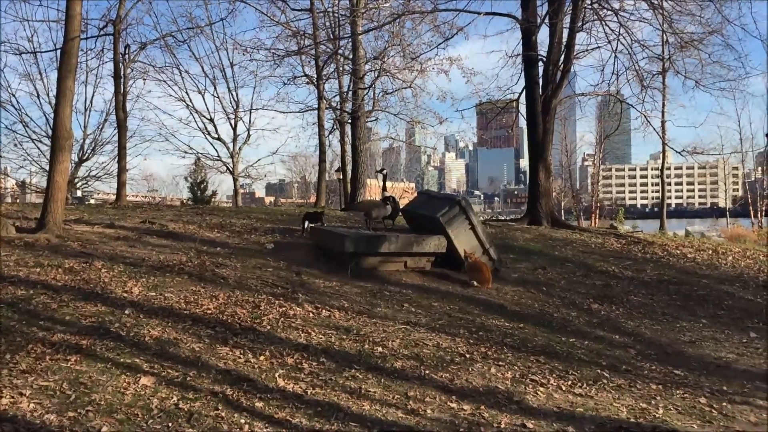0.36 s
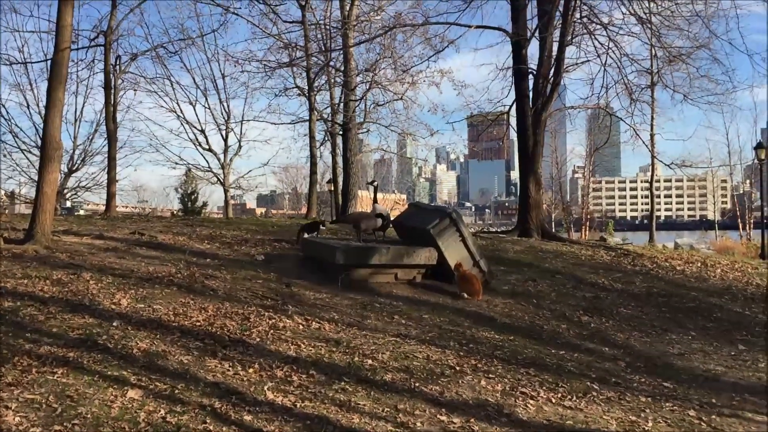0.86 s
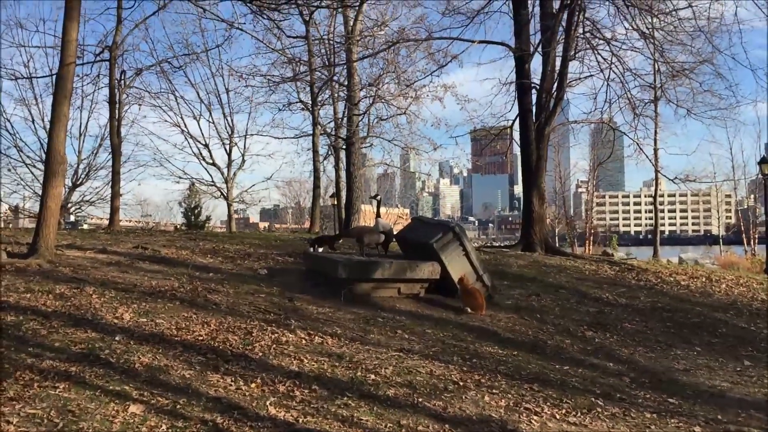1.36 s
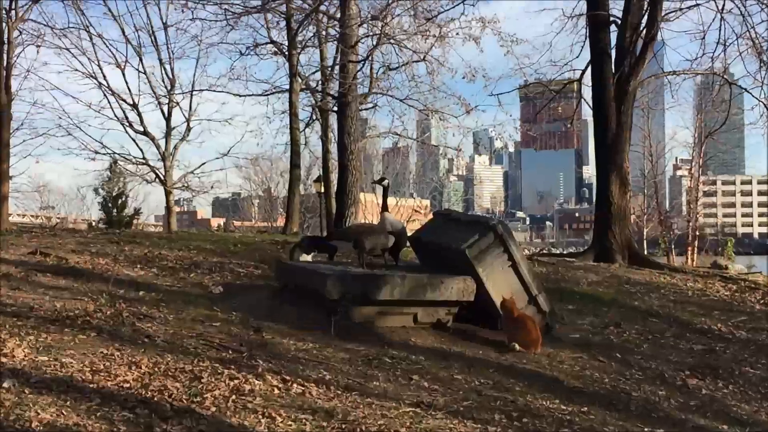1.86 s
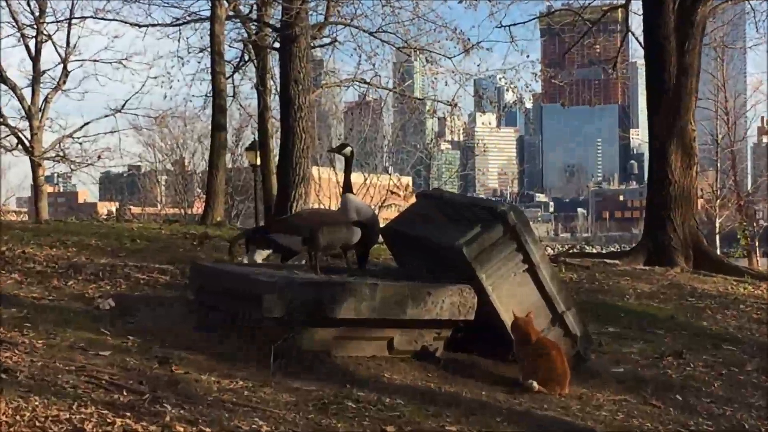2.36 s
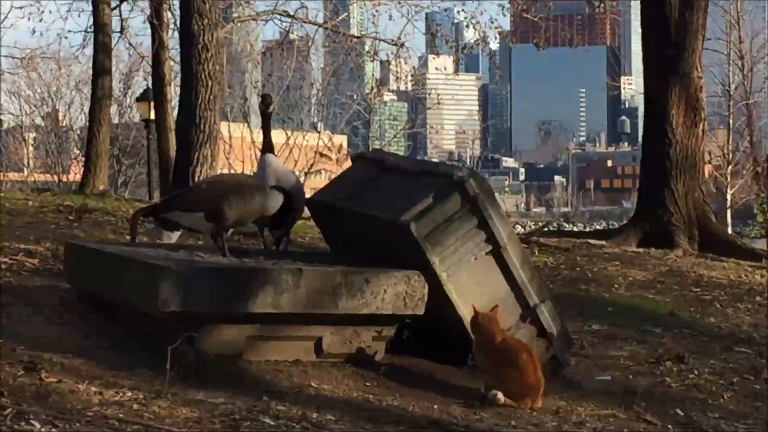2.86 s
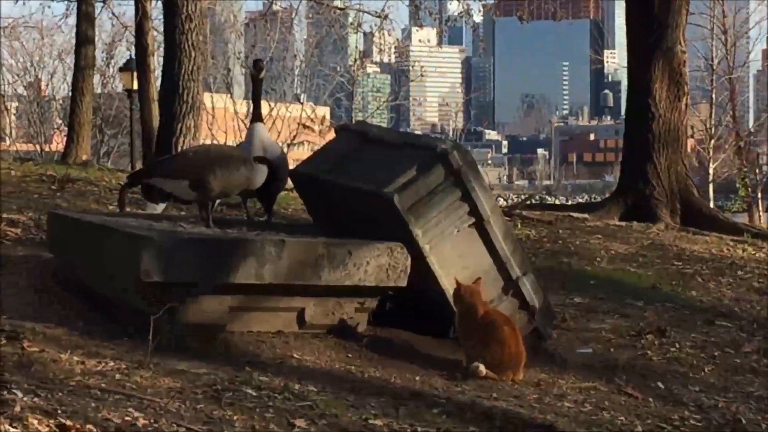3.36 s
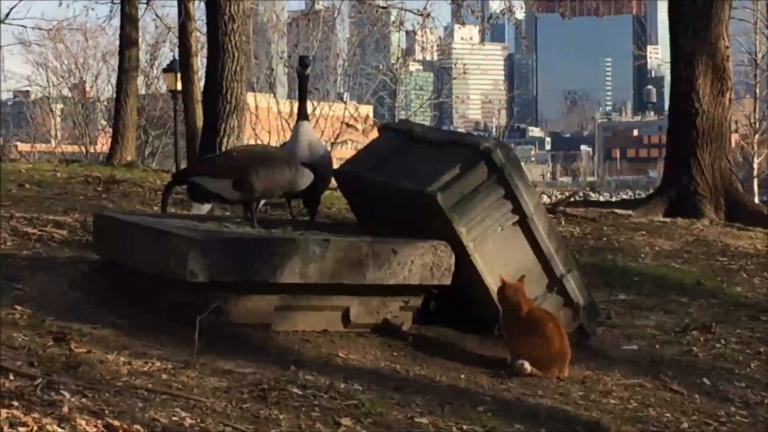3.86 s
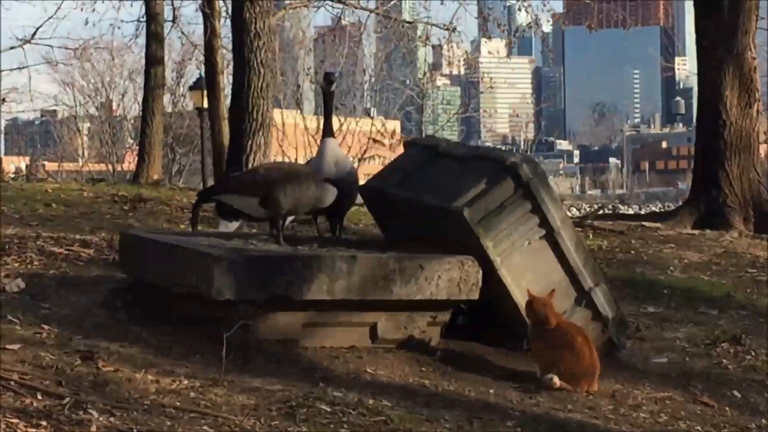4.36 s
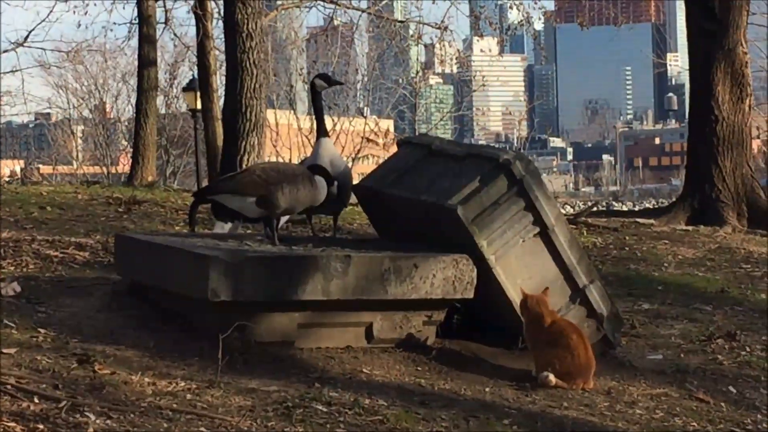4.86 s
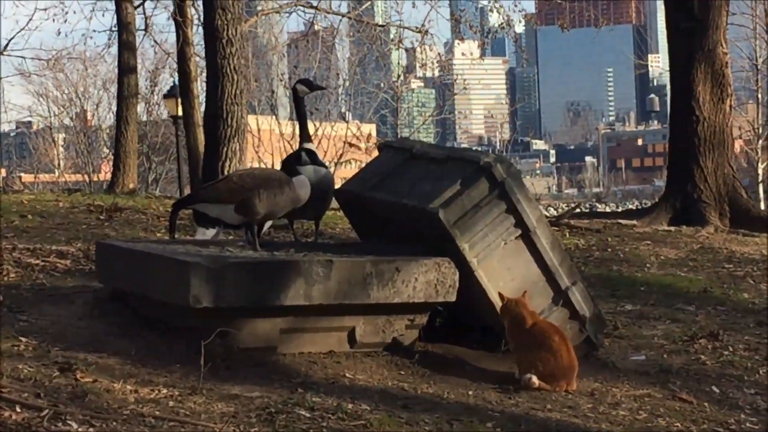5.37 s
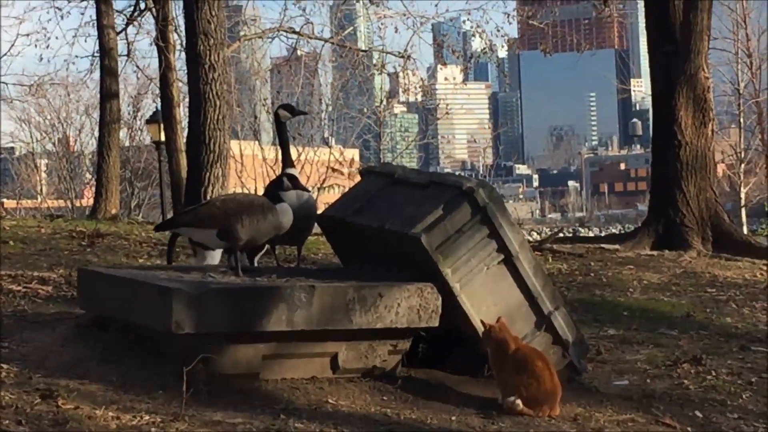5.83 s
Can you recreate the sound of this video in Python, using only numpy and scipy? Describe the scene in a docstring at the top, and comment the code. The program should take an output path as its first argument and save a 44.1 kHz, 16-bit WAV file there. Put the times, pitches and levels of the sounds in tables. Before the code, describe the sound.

Two brief, nasal goose honks echo across a park over steady low city rumble, with hard close clicks, cloth rustle and tiny metallic chinks.

```python
"""Goose in a riverside city park

One goose some metres from a hand-held phone honks twice: stacked partials with a breathy rasp before each.
Filtered copies return from trees and far walls. Close to the microphone, fingers tick and creak on the
phone's case (pulses and gritty noise in resonances), a sleeve rustles (shaped noise) and small metal pieces
chink (noise cracks with ringing sines). Low traffic rumble, roar and hiss lie behind it all (shaped noise).
"""
import sys
import numpy as np
from scipy import signal
from scipy.fft import rfft, irfft
from scipy.io import wavfile
from scipy.ndimage import uniform_filter1d

SR = 44100
rng = np.random.default_rng(int(sys.argv[2]) if len(sys.argv) > 2 else 0)


def output_pcm(signal):
    """Save a mono or channel-first signal as 16-bit PCM at the path in sys.argv[1].

    Samples are clipped to [-1, 1] before scaling.
    """
    pcm = np.clip(np.atleast_2d(signal).T, -1, 1) * 32767
    wavfile.write(sys.argv[1], SR, np.round(pcm).astype(np.int16))


def rack_gain(trim_db):
    """Turn a fader trim in dB into the linear factor to multiply a signal by."""
    fader = np.asarray(trim_db, float)
    return 10 ** (fader / 20)


N = 274302
TIME = np.arange(N) / SR

# Honks of the goose: [voice locks t/s, length/s, base pitch f/Hz, level at the lock/dB,
# treble tilt of the beak at the end/dB per octave]
HONKS = [(0.046, 0.056, 637.7, -39, 2), (2.429, .054, 657.6, -36, 7)]
# Partials of each honk, before the beak's tilt: [multiple of the pitch, level/dB]
PARTIALS = [
    [(1, -1), (2, 4.5), (3, -10), (4, -21.5), (5, -33), (6, -24.5), (7, -28), (8, -24), (9, -26), (10, -31),
     (11, -35), (12, -37)],
    [(1, -2.5), (2, 1), (3, -14), (4, -32.5), (5, -33.5), (6, -27), (7, -38), (8, -37.5), (9, -38.5),
     (10, -41), (11, -48), (12, -58), (13, -57), (14, -58)],
]
# Throat resonances of the unvoiced breath: [f/Hz, width/Hz, level/dB]
THROAT = [(1100, 250, 11), (1298, 210, 5), (1940, 280, -20)]
# Breath swells before the lock, relative to the honk
RASP_S, RASP_FROM_DB, RASP_TO_DB = 0.11, -41.5, -7
LOCK_S, STOP_S = 0.004, 0.0053  # time for the voice to catch and to stop
FLAT_START, SETTLE_S = 0.07, 0.013  # share by which the pitch starts flat; time constant of its slide up
SAG_DB_PER_S, CLIMB_PER_S = 55, 0.26  # fall in level; share by which the pitch rises per second
BEAK_START_DB, HOARSE = -2, 0.05  # tilt at the lock in dB per octave; gain of rasp in the locked voice

# Diffuse echoes of the park: [t60/s, level before the band-pass/dB, low edge f/Hz, high edge f/Hz]
PARK = (0.64, -5, 1008, 6004)
# Clear echoes off trunks and walls: [delay t/s, level/dB]
CLEAR_ECHOES = [(0.058, -5), (0.09, -16.5), (.115, -20.5)]
# Dull late echoes off the far walls: [delay t/s, level/dB]
FAR_WALL = [(.175, -21.5), (0.204, -24.5), (0.234, -20.5)]
NEAREST_S = 0.014  # the small echoes build up over this time

# Single finger ticks on the case: [t/s, body level/dB, edge re body/dB, low modes re body/dB]
TICKS = [(.3180, -22, 3.5, -54), (0.714, -45, 2, -22), (0.7604, -29.5, 0, -8), (0.7714, -19.5, 3, -8),
         (.8498, -38, 7, -26), (0.856, -35, 15.5, -8), (0.862, -46.5, 19.5, -33), (0.8738, -37.5, 10, -27),
         (2.769, -56, 6.5, -15), (2.863, -39, -15, -19), (4.014, -28, 6.5, -7.5), (4.0490, -8, -14, -26),
         (4.0532, -9, -20, -24), (4.0655, -2, -18, -24), (4.2953, -9, -6, -20), (4.3000, -9, -8, -20),
         (4.3038, -11, -8, -18), (4.566, -54, 16.5, 4), (4.878, -72.5, -14, 23.5), (5.038, -56.5, 14, 21),
         (5.464, -56, -10, -6)]
RATTLE_DB, RATTLE_T60_S = -17, 0.005  # each tick shakes on briefly, relative to its first click
# Skin slipping over the case: [t/s, length/s, body level/dB, edge re body/dB]
CREAKS = [(0.078, 0.067, -55, 3), (0.119, 0.11, -74.5, 1), (0.266, 0.079, -64.5, 6),
          (0.495, 0.0088, -84, 15.5), (0.734, 0.061, -66, 6.5), (0.785, 0.067, -77.5, 10),
          (0.838, 0.068, -66, 8), (1.277, 0.11, -90, 13), (1.534, .03, -90, 15.5),
          (2.839, 0.059, -65.5, -1.5), (3.221, 0.14, -84, 12.5), (3.395, 0.044, -80.5, 7),
          (3.954, 0.073, -71.5, -2), (3.99, 0.012, -50.5, 1), (3.999, 0.043, -47.5, -3),
          (4.038, 0.017, -37.5, -14), (4.058, 0.014, -36.5, -12), (4.289, .03, -31.5, 2.5)]
GRIP_RISE, GRIP_FALL = 0.3, 0.35  # shares of a creak spent pressing on and letting go
# Body modes of the case: [f/Hz, width of each of two passes/Hz, level/dB]
CASE_BODY = [(3800, 1400, -1.5), (2380, 680, -14.5), (6640, 620, -20), (8720, 3700, -21.5)]
# Edge modes of the case: [f/Hz, width of each of two passes/Hz, level/dB]
CASE_EDGE = [(6100, 1300, -6.5), (12160, 7500, -10.5), (13900, 4800, -20)]
# Low modes of the case: [f/Hz, width of each of two passes/Hz, level/dB]
CASE_LOW = [(504.4, 650, -2.5), (1710, 880, -8), (2050, 810, -5.5)]

# Metal chinks: [t/s, crack level before the band-pass/dB, ring level re crack/dB]
CHINKS = [(5.136, -54.5, -16), (5.2525, -36, -20), (5.293, -46, -24), (5.3336, -54, -27),
          (5.3737, -50, -15), (5.411, -30.5, -9), (5.4212, -40, -4), (5.437, -46.5, -27),
          (5.4604, -52.5, 2.5), (5.489, -50, -32), (5.9055, -62, -35)]
# Ringing modes of the metal: [f/Hz, starting level/dB, t60/s]
METAL_MODES = [(9440, 0.5, 0.061), (10520, -18, .06), (15200, -6, .02), (15900, 3, .025)]

# Sleeve strokes: [t/s, length/s, level/dB, crisp part re dull part/dB]
SLEEVE_STROKES = [(4.201, 0.99, -75, 6.5), (4.334, 0.17, -60.5, -4), (4.545, 0.43, -65, -11),
                  (4.893, 0.39, -65, -4.5), (5.188, 0.27, -50.5, -2.5), (5.416, 0.15, -60, -2.5),
                  (5.526, 0.3, -64.5, -7.5), (5.799, 0.54, -69, 2.5)]
# Relative spectrum of the cloth: [f/Hz, level/dB per Hz]
SLEEVE_COLOUR = [(900, -18.5), (1400, -9), (2100, -0.5), (2600, -4), (3700, -9), (7400, -11), (16000, -16)]
CLOTH_GRIT_DB, STROKE_RISE = 1.5, 0.24  # spread of grain sizes; share of a stroke spent getting louder

# Relative spectrum of the city air: [f/Hz, level/dB per Hz]
CITY_COLOUR = [(13, -47), (22, -36), (43, -4.5), (63, 4.5), (80, -1.5), (98, -1.5), (157, -8.5),
               (219, -14.5), (351, -25), (403, -27), (926, -34.5), (1220, -42.5), (2880, -54.5),
               (3400, -49.5), (4880, -57.5), (10500, -61.5), (12500, -61), (15200, -61.5), (16500, -79.5)]
# Uneven loudness of the low traffic rumble: [centre t/s, half-width at 1/e/s, change/dB]
LOUDNESS_DRIFT = [(.05, 0.067, -2), (.2, 0.04, 3.5), (.32, 0.022, -7), (1.21, 0.022, 6), (2.0, 0.057, -3.5),
                  (2.49, .06, 1.5), (3.3, 0.043, -3), (4.45, 0.025, -15), (4.52, .04, 3.5),
                  (5.58, 0.044, 4.5), (5.72, 0.049, -9)]
SPLIT_HZ, HISS_HZ = 123.8, 2000  # rumble lies below the first, smooth hiss above the second
RUMBLE_DB, RUMBLE_FADE_DB_PER_S, ROAR_DB = -40, 0.45, -46  # the rumble recedes slowly, the roar stays


def unit(x):
    """Scale to rms 1."""
    return x / np.sqrt(np.mean(x ** 2))


def coloured(points, x):
    """Shape x by (f/Hz, level/dB) points, interpolated over log frequency."""
    hz, db = np.transpose(points)
    axis = np.log(np.arange(len(x) // 2 + 1) * SR / len(x) + 1)
    return irfft(rfft(x) * rack_gain(np.interp(axis, np.log(hz), db)), len(x))


def resonate(x, modes):
    """Sum of steep resonances (f/Hz, width/Hz, level/dB), scaled so that one click peaks at 1."""
    def ring(v):
        total = 0
        for hz, width, db in modes:
            peak = np.concatenate(signal.iirpeak(hz, hz / width, SR))
            total = total + rack_gain(db) * signal.sosfilt([peak] * 2, v)  # two passes
        return total
    return ring(x) / np.abs(ring(signal.unit_impulse(256))).max()


def band(x, low_hz, high_hz, order=2):
    """Butterworth band-pass."""
    edges = [low_hz, min(high_hz, 0.49 * SR)]
    return signal.sosfilt(signal.butter(order, edges, "band", fs=SR, output="sos"), x)


def low_part(x, edge_hz):
    """Zero-phase low-pass, so that the rest can be had by subtraction."""
    return signal.sosfiltfilt(signal.butter(2, edge_hz, fs=SR, output="sos"), x)


def walk(rate):
    """Smooth chance of rms 1 that changes about rate times a second."""
    k = int(SR / rate)
    return unit(uniform_filter1d(uniform_filter1d(rng.standard_normal(N), k), k))


def grit(spread_db):
    """Noise whose samples have heavy-tailed sizes, as from stick-slip friction."""
    return unit(rng.standard_normal(N) * rack_gain(spread_db * walk(1500)))


def goose():
    """Throat rasp locks into a stack of partials that brightens as the beak opens."""
    out = np.zeros(N)
    rasp = unit(resonate(grit(1.2), THROAT))
    for (s, length, pitch_hz, db, end_db), partials in zip(HONKS, PARTIALS):
        since = TIME - s
        held = np.clip(since, 0, length)
        locked = np.clip(since / LOCK_S, 0, 1)
        flat = FLAT_START * np.exp(-np.clip(since, 0, 1) / SETTLE_S)
        hz = pitch_hz * (1 - flat + CLIMB_PER_S * held)
        phase = 2 * np.pi * np.cumsum(hz * (1 + 0.0077 * walk(130))) / SR
        open_db = np.interp(since, [0, length], [BEAK_START_DB, end_db])
        stack = 0
        for k, p_db in partials:
            flutter_db = 0.51 * k * walk(92)  # the higher a partial, the more it flutters
            level = rack_gain(p_db + open_db * np.log2(k / 2) + flutter_db)
            stack = stack + level * np.sin(round(k) * phase + k * k)
        breath = rack_gain(np.interp(since, [-RASP_S, 0], [RASP_FROM_DB, RASP_TO_DB], -120))
        voice = locked * (np.sqrt(2) * stack + HOARSE * rasp) + (1 - locked) * breath * rasp
        stop = np.clip((length - since) / STOP_S, 0, 1)
        out += voice * rack_gain(db - SAG_DB_PER_S * held) * stop
    return out


def park(x):
    """A few clear echoes over a fading crowd of small ones; trunks return little of the lowest partial."""
    t60, db, low_hz, high_hz = PARK
    t = TIME[:SR]
    near = rng.standard_normal(SR) * rack_gain(-60 * t / t60)
    near *= np.clip(t / NEAREST_S, 0, 1) ** 3
    near *= rack_gain(db) / np.sqrt(np.sum(near ** 2))
    for delay, echo_db in CLEAR_ECHOES:
        near[int(delay * SR)] += rack_gain(echo_db)
    far = np.zeros(SR)
    for delay, echo_db in FAR_WALL:
        far[int(delay * SR)] = rack_gain(echo_db)
    response = band(near, low_hz, high_hz) + band(far, low_hz, 1840)
    return signal.fftconvolve(x, response)[:N]


def case():
    """Ticks and creaks ring the modes of the phone case; each contact has its own balance of modes."""
    body, edge, low = np.zeros((3, N))
    rattle = rack_gain(RATTLE_DB - 60 * TIME[:512] / RATTLE_T60_S)
    shakes = rng.standard_normal((len(TICKS), 512)) * rattle
    shakes[:, 0] = 1  # the first click
    for (s, db, edge_db, low_db), shake in zip(TICKS, shakes):
        at = slice(int(s * SR), int(s * SR) + 512)
        body[at] += rack_gain(db) * shake
        edge[at] += rack_gain(db + edge_db) * shake
        low[at] += rack_gain(db + low_db) * shake
    slips = grit(3.5) * rack_gain(1.8 * walk(230))  # the skin catches and lets go in uneven runs
    for s, length, db, edge_db in CREAKS:
        press = (TIME - s) / (GRIP_RISE * length)
        release = (s + length - TIME) / (GRIP_FALL * length)
        creak = np.clip(np.minimum(press, release), 0, 1) * slips
        body += rack_gain(db) * creak
        edge += rack_gain(db + edge_db) * creak
        low += rack_gain(db - 16.5) * creak
    return resonate(body, CASE_BODY) + resonate(edge, CASE_EDGE) + resonate(low, CASE_LOW)


def metal():
    """Each chink is a bright noise crack and a short ring of the same modes."""
    size = 8192
    out, t = np.zeros(N + size), TIME[:size]
    ring = 0
    for hz, mode_db, t60 in METAL_MODES:
        ring = ring + rack_gain(mode_db - 60 * t / t60) * np.sin(2 * np.pi * hz * t)
    for s, db, ring_db in CHINKS:
        burst = rng.standard_normal(size) * rack_gain(-60 * t / 0.005)  # t60 of 5 ms
        crack = 2.5 * band(burst, 11000, 18000, order=1)
        start = int(s * SR)
        out[start:start + size] += rack_gain(db) * (crack + rack_gain(ring_db) * ring)
    return out[:N]


def sleeve():
    """Cloth brushing on cloth: soft gritty hiss in patches; a crisp fold has more treble."""
    hiss = unit(coloured(SLEEVE_COLOUR, grit(CLOTH_GRIT_DB)))
    dull = low_part(hiss, 3500)
    crisp = (hiss - dull) * rack_gain(0.98 * walk(30))
    dull = dull * rack_gain(3.5 * walk(40))
    out = np.zeros(N)
    for s, length, db, crisp_db in SLEEVE_STROKES:
        stroke = np.interp(TIME - s, [0, STROKE_RISE * length, length], [0, 1, 0]) ** 1.18
        out += rack_gain(db) * stroke * (dull + rack_gain(crisp_db) * crisp)
    return out


def city():
    """Far traffic: a deep, uneven rumble, a wavering roar above it and a smooth hiss."""
    air = coloured(CITY_COLOUR, rng.standard_normal(N))
    deep = low_part(air, SPLIT_HZ)
    hiss = coloured([(HISS_HZ / 4, -40), (HISS_HZ, 0)], air)
    roar = (air - deep - hiss) * rack_gain(1.7 * walk(23) + 0.37 * walk(2))
    upper = roar + hiss * rack_gain(0.5 * walk(5))
    drift_db = sum(db * np.exp(-((TIME - s) / width) ** 2) for s, width, db in LOUDNESS_DRIFT)
    rumble_db = RUMBLE_DB - RUMBLE_FADE_DB_PER_S * TIME + drift_db
    return unit(deep) * rack_gain(rumble_db) + unit(upper) * rack_gain(ROAR_DB)


def scene():
    """All sources, near and far, at one microphone."""
    honks = goose()
    return (honks + park(honks) + case() + metal() + sleeve() + city())[None]


def band_limit(x):
    """A steep low-pass at the top of the band."""
    return signal.sosfilt(signal.butter(12, 17160, fs=SR, output="sos"), x)


def record(dry):
    """The phone's microphone path cuts the top steeply above 15.8 kHz."""
    top_cut = signal.ellip(6, 0.3, 45, 15800, fs=SR, output="sos")
    mix = signal.sosfilt(top_cut, dry)
    return band_limit(mix)


dry = scene()
out = record(dry)
output_pcm(out)
```